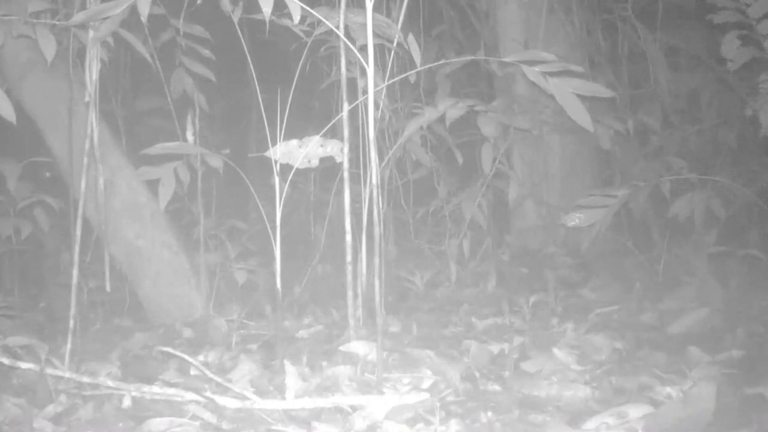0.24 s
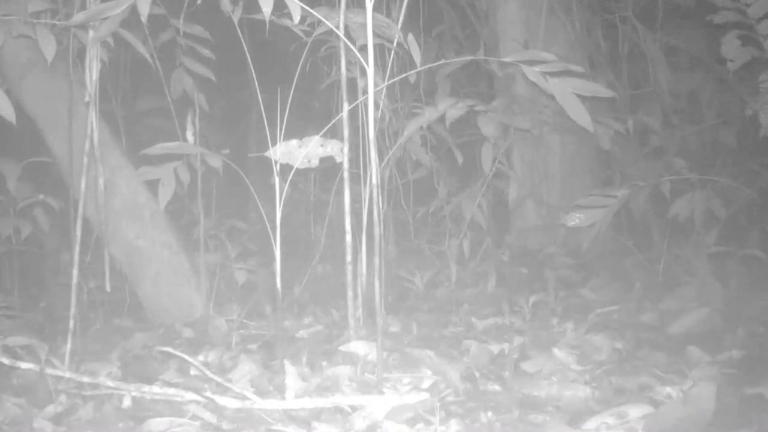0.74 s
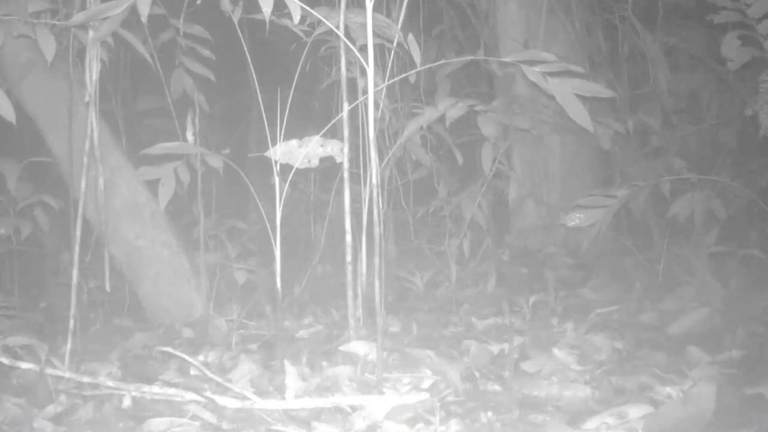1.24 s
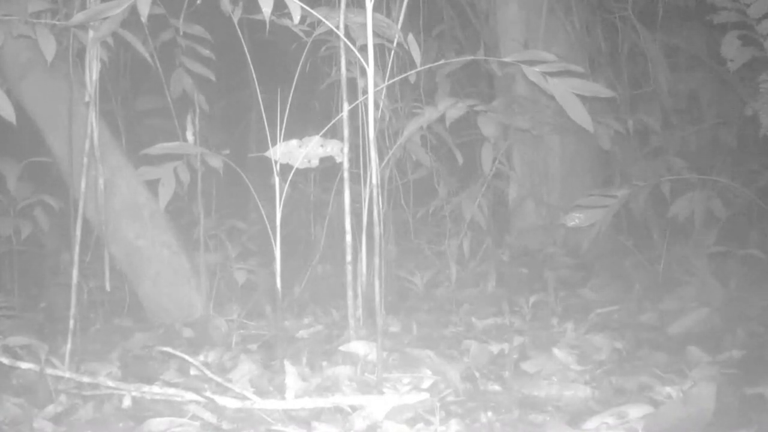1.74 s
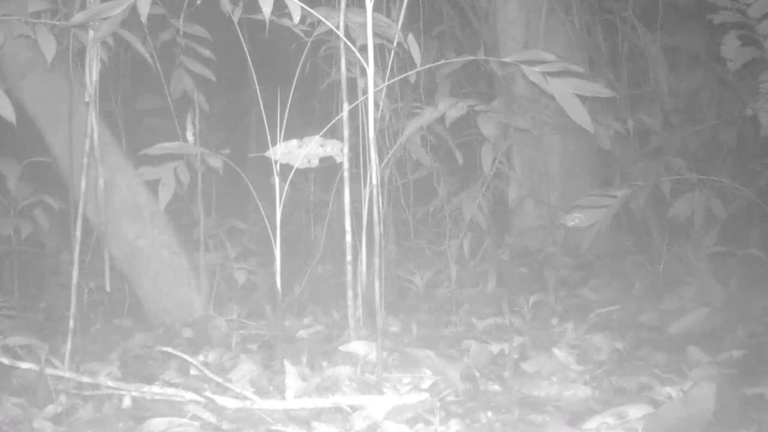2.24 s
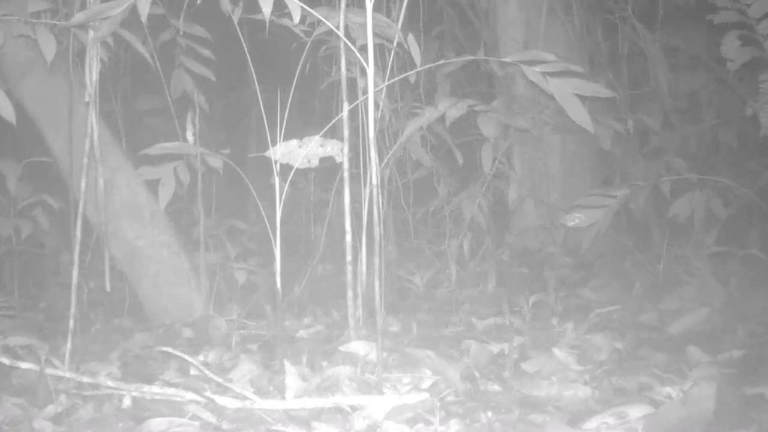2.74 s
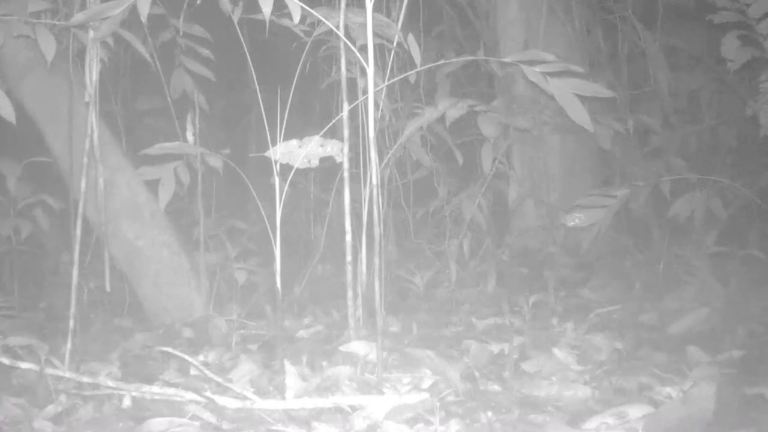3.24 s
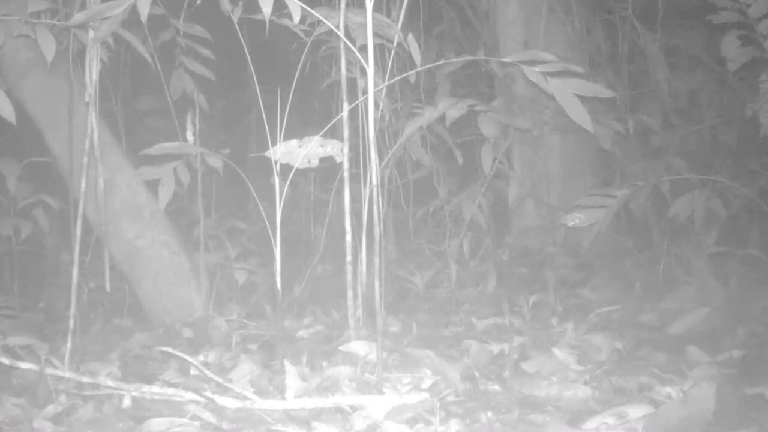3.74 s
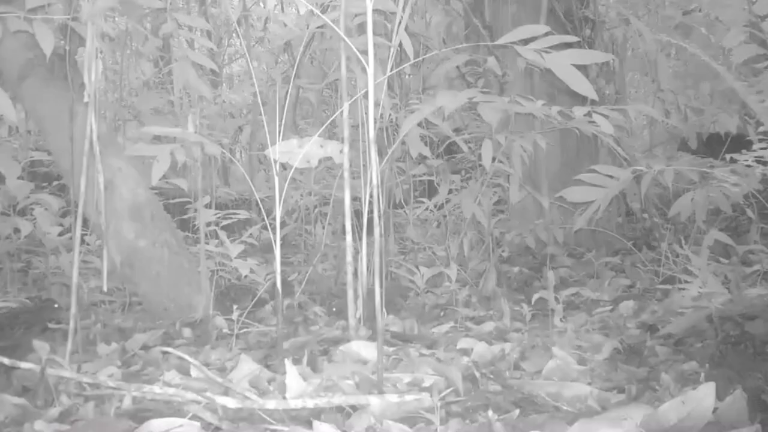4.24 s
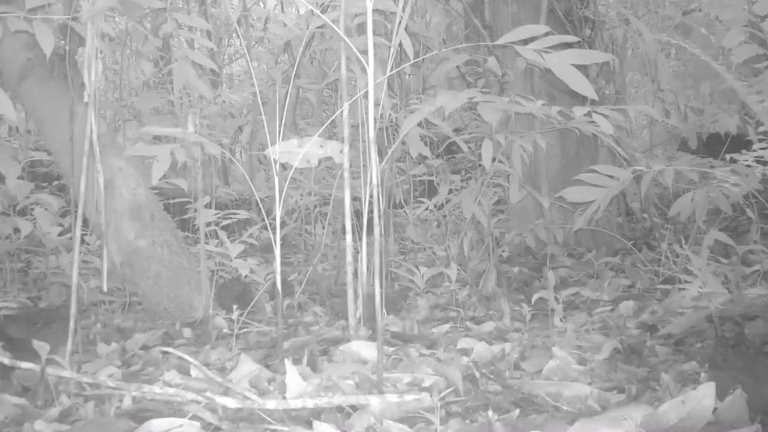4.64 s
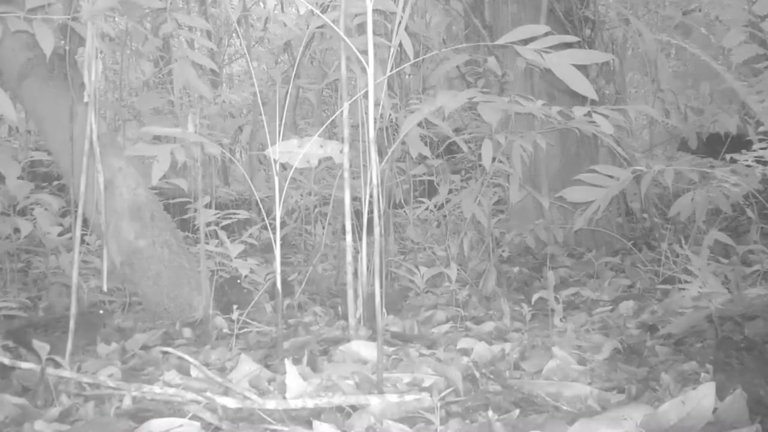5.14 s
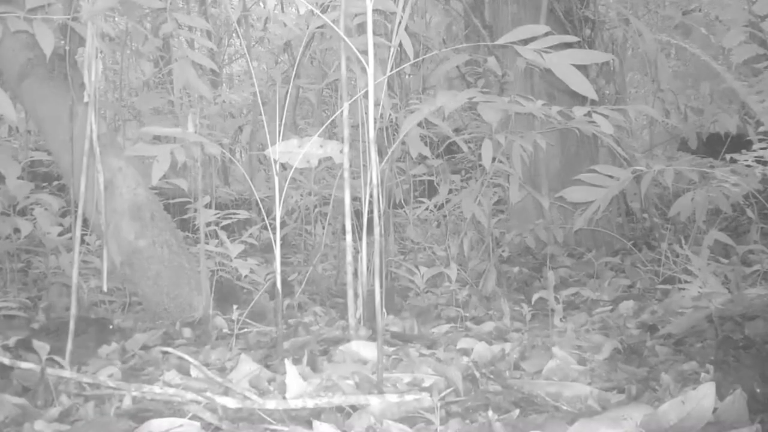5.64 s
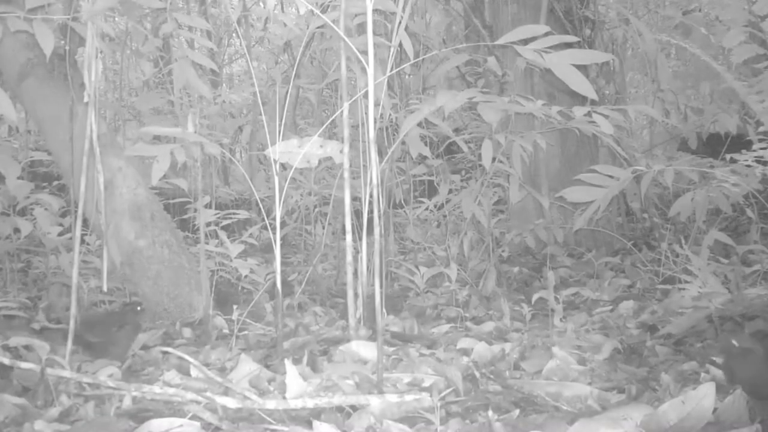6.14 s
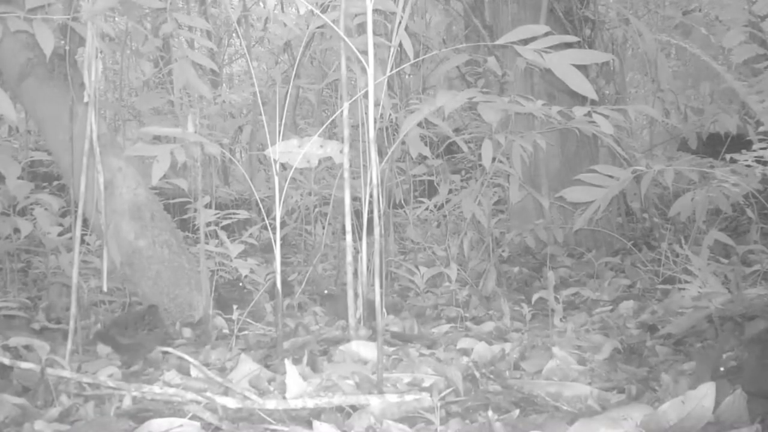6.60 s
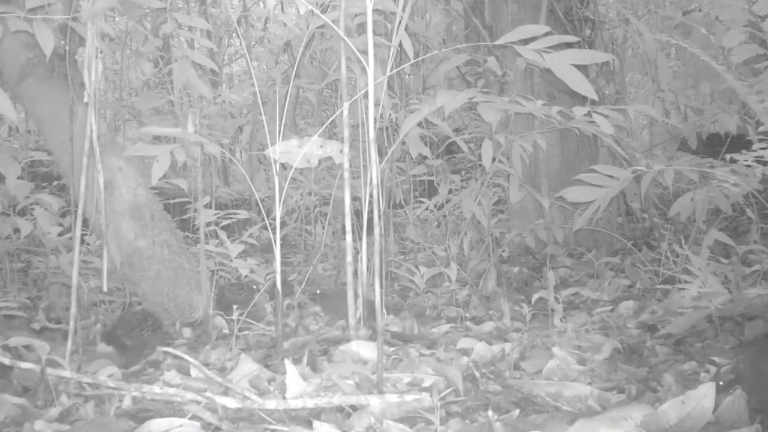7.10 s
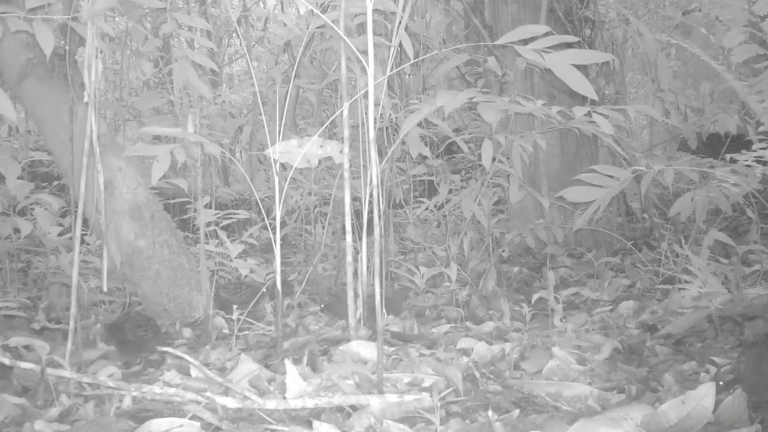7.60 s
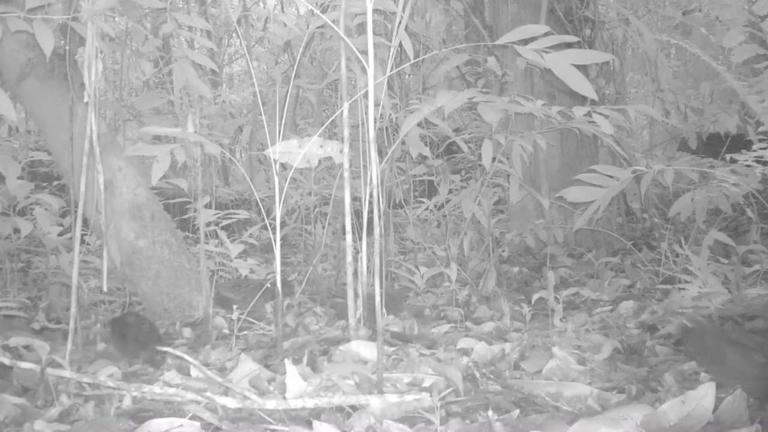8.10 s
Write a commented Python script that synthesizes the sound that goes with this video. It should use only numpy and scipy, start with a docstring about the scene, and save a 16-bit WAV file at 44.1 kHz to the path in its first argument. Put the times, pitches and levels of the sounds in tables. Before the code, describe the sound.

Heard on a trail camera's hissy microphone with a low electrical flutter, night insects sing in a dense, high, throbbing chorus while drops tick nearby. The chorus stops abruptly in a brief silence. Then comes the quieter daytime forest: a run of thin, echoing bird whistles, one barely audible chirping insect, soft scuffles of small feet in leaf litter and a few faint, hoarse bird calls far away.

```python
"""A shrill insect chorus pulses in a rain forest at night, heard on a trail camera's microphone.
Rapid strokes ring the insects' wings among the trees, and drips tap something hard close by.
The sound cuts out for a moment and returns by day: thin bird whistles echoing between the trunks,
small feet rustling faintly in the leaf litter and one far insect chirping.
The camera's own hiss and a low electrical flutter run under both scenes."""
import sys
import numpy as np
from scipy import signal
from scipy.fft import rfft, irfft, next_fast_len
from scipy.io import wavfile

SR = 44100
rng = np.random.default_rng(int(sys.argv[2]) if len(sys.argv) > 2 else 0)


def pcm_store(signal):
    """Save signal as 16-bit PCM."""
    levels = np.round(np.clip(np.atleast_2d(signal), -1, 1) * 32767)
    wavfile.write(sys.argv[1], SR, levels.astype(np.int16).T)


N = 368665
TIME = np.arange(N) / SR
# when the camera runs, night then day: start_s, end_s, first_flutter_s
CAMERA_RUNS = [(0, 3.952, .0053), (4.159, 8.4, 4.1664)]
DAY_START_S = CAMERA_RUNS[1][0]


def undb(db):
    """Decibels to gain."""
    return 10 ** (np.asarray(db) / 20)


def unit(x):
    """Scale to rms 1."""
    return x / np.sqrt(np.mean(np.abs(x) ** 2))


def curve(rows):
    """Join (time, value) points with straight lines."""
    return np.interp(TIME, *np.transpose(rows))


def butter(x, hz, kind="low"):
    """Second-order Butterworth filter."""
    return signal.sosfilt(signal.butter(2, hz, kind, fs=SR, output="sos"), x)


def colour(x, points):
    """Filter a sound through (Hz, relative dB) points and scale it to rms 1."""
    hz, db = np.transpose(points)
    size = next_fast_len(N)
    bins = np.maximum(np.fft.rfftfreq(size, 1 / SR), 1)
    gain = undb(np.interp(np.log(bins), np.log(hz), db))
    return unit(irfft(rfft(x, size) * gain, size)[:N])


def walk(per_s):
    """A smooth random wander with a spread near 1."""
    knots = rng.standard_normal(4096)
    return np.interp(TIME * per_s, np.arange(len(knots)), knots)


def bend(x, shift_hz):
    """Slide a narrow band up and down in pitch."""
    analytic = signal.hilbert(x, next_fast_len(N))[:N]
    return np.real(analytic * np.exp(2j * np.pi * np.cumsum(shift_hz) / SR))


def tone(hz, half_width_hz):
    """A band of noise; when narrow, a tone that wavers as if its echoes interfere."""
    waver = butter(rng.standard_normal(N) + 1j * rng.standard_normal(N), half_width_hz)
    return unit(np.real(waver * np.exp(2j * np.pi * hz * TIME)))


def forest(x, t60_s, direct):
    """Trunks and leaves scatter a sound into a dense, dying tail; less direct sound is farther off."""
    tail = rng.standard_normal(SR) * np.exp(-np.log(1000) * TIME[:SR] / t60_s)
    tail /= np.linalg.norm(tail)
    tail[0] += direct
    return signal.fftconvolve(x, tail)[:N] / np.hypot(1, direct)


def insects(wing, stroke_hz, jitter, count):
    """Rapid, uneven strokes ring the wings; each insect is smeared by its own path through the trees."""
    out = np.zeros(N)
    for _ in range(count):
        strokes, chance = np.zeros(N), rng.standard_normal((4096, 2))
        own_hz = stroke_hz * undb(.5 * rng.standard_normal())
        periods = (1 + jitter * chance[:, 0]) / own_hz
        at = (np.cumsum(np.abs(periods)) * SR).astype(int)
        np.add.at(strokes, at[at < N], undb(2 * chance[at < N, 1]))
        out += forest(strokes - strokes.mean(), t60_s=.26, direct=.77)
    # they are already singing, so their echoes are built up from the start
    return colour(np.roll(out, -SR), wing)


def chorus_effort():
    """Two groups pulse at slightly different rates, drifting in and out of step."""
    # pulse of each group: rate_hz, first_peak_s, share
    groups = [(6.35, .080, .56), (6.66, .104, .44)]
    return sum(share * np.cos(2 * np.pi * hz * (TIME - peak_s)) for hz, peak_s, share in groups)


def chorus(effort, level_db=-27.5, pulse_db=1.5, rise_hz=28):
    """The main insects sing louder and higher as their effort rises."""
    # wing resonance: frequency_hz, relative_db
    wing = [(3500, -60), (4000, -17), (4110, -10), (4190, -3), (4420, .5), (4620, -2.8), (4760, -7.5),
            (4900, -14.5), (5080, -23), (5400, -32), (6400, -60)]
    song = insects(wing, stroke_hz=200, jitter=.15, count=4)
    return bend(song, rise_hz * effort) * undb(level_db + pulse_db * effort)


def throbbers(rest_db=-47, fade_s=.12):
    """Higher insects with slower strokes swell in phrases above a steady level."""
    # wing resonance: frequency_hz, relative_db
    wing = [(5000, -43), (5500, -12), (5740, -0.5), (5900, 3), (6050, 0), (6220, -12), (6400, -22),
            (7000, -59.5)]
    # phrases: start_s, length_s, level_db
    phrases = [(-0.2, 0.23, -40), (0.24, 0.68, -44.5), (1.02, .38, -47), (1.41, .25, -42.5),
               (2.02, 0.64, -44.5), (3.03, .12, -43), (3.3, 0.15, -42.5), (3.5, 0.14, -46)]
    power = undb(rest_db) ** 2
    for start, length, db in phrases:
        inside_s = np.minimum(TIME - start, start + length - TIME)
        power = power + undb(db) ** 2 * np.clip(.5 + inside_s / fade_s, 0, 1)
    return insects(wing, stroke_hz=58, jitter=.06, count=8) * np.sqrt(power)


def buzzers():
    """Lower insects ring their wings in a steadier buzz."""
    # wing resonance: frequency_hz, relative_db
    wing = [(2800, -44), (3330, -21), (3500, -8.5), (3660, 1), (3800, -0.5), (3950, -6.5), (4200, -11),
            (4800, -51.5)]
    # loudness of the buzz: time_s, level_db
    levels = [(0.0, -42), (0.24, -40), (0.66, -40.5), (0.9, -42), (1.66, -42.4), (2.11, -39), (2.96, -41.5),
              (3.64, -40), (3.94, -40.5)]
    return insects(wing, stroke_hz=130, jitter=.15, count=5) * undb(curve(levels))


def far_crickets(level_db=-52.5, wander_db=1.3):
    """Distant crickets stroke sharply tuned wings, wandering a little in level."""
    # wing resonance: frequency_hz, relative_db
    wing = [(2600, -49), (2850, -10), (2915, 3.5), (2960, 0), (3010, -4.5), (3300, -45)]
    song = insects(wing, stroke_hz=30, jitter=.1, count=6)
    return song * undb(level_db + wander_db * walk(per_s=5))


def held_notes(effort):
    """Held insect notes, some pulsing with the chorus; far crowds of insects blur into bands."""
    # held notes: pitch_hz, half_width_hz, level_db, pulse_db
    # the two highest are the throbbers' steady ringing overtones
    notes = [(3166, 6, -61, 0), (4406, 9, -40.5, 1.5), (4602, 5, -38.5, 4), (5860, 9, -55, 0),
             (5917, 7, -52.5, 0)]
    # very distant insects: pitch_hz, half_width_hz, level_db
    crowds = [(2574, 54, -60), (3265, 70, -57), (8600, 600, -64.5)]
    held = sum(undb(db + pulse_db * effort) * tone(hz, width) for hz, width, db, pulse_db in notes)
    return held + sum(undb(db) * tone(hz, width) for hz, width, db in crowds)


def high_sizzle(peak_db=-60, period_s=1.13, peak_s=1.02, swing_db=6):
    """One very high insect whose faint sizzle swells and fades in slow waves."""
    wave = np.cos(2 * np.pi * (TIME - peak_s) / period_s)
    return tone(12300, half_width_hz=1500) * undb(peak_db + swing_db * (wave - 1))


def night_air(level_db=-54, flicker_db=3):
    """The flickering wash of the far forest."""
    # spectrum of the wash: frequency_hz, relative_db
    spectrum = [(600, -18.5), (1200, 3.5), (1800, 5), (3000, 8), (5300, -2), (7000, -36), (10000, -21),
                (14000, -30)]
    return colour(rng.standard_normal(N), spectrum) * undb(level_db + flicker_db * walk(per_s=40))


def camera_hiss(level_db=-36.5):
    """The camera's own steady noise, strongest in the bass."""
    # noise floor: frequency_hz, relative_db
    spectrum = [(8, -24), (30, 1.5), (110, -2), (200, -4.5), (320, -8), (500, -12), (800, -17.5),
                (1300, -23), (2200, -28), (4000, -33), (6300, -38.5), (7600, -36.5), (10500, -39),
                (14000, -41)]
    return undb(level_db) * colour(rng.standard_normal(N), spectrum)


def camera_flutter(level_db=-37.5, rate_hz=22.245, pulse_s=.0057, scatter_db=2):
    """The electronics draw current in short regular bursts that thump in the microphone circuit."""
    bursts = np.zeros(N)
    for _, end, first in CAMERA_RUNS:
        for s in np.arange(first, end, 1 / rate_hz):
            bursts[int(s * SR):int((s + pulse_s) * SR)] = -undb(scatter_db * rng.standard_normal())
    return undb(level_db) * unit(butter(butter(bursts, 20, "high"), 140))


def drips(splash_db=-7, splash_s=.0077):
    """Drops tap something hard and well damped beside the microphone, and spatter briefly."""
    # drops: start_s, gain_db, pitch_ratio
    drops = [(0.972, -37, 1.1), (0.991, -31, .95), (1.308, -35, .85), (1.362, -28.5, 1.4),
             (1.377, -31, 1.2), (2.018, -32, .9), (2.491, -33, 0.82), (2.693, -38.5, 1.1),
             (3.061, -31, 1.44), (3.6508, -15.5, 0.99)]
    # modes of the struck surface: pitch_hz, relative_db, t60_s
    modes = [(620, -13, 0.008), (1004, -4, 0.005), (1540, -11.5, 0.0079), (1770, -2.5, 0.012),
             (2300, -18.5, 0.01), (2920, -22, 0.008), (3860, 1.5, 0.0083), (6000, -5, 0.007)]
    t = TIME[:4096]
    out = np.zeros(N)
    for s, db, ratio in drops:
        ring = sum(undb(mode_db) * np.sin(2 * np.pi * hz * ratio * t) * np.exp(-np.log(1000) * t / t60)
                   for hz, mode_db, t60 in modes)
        spray = butter(butter(rng.standard_normal(len(t)), 3500), 500, "high")
        splash = undb(splash_db) * spray * np.exp(-t / splash_s)
        start = int(s * SR)
        out[start:start + len(t)] += undb(db) * (splash - ring)
    return butter(out, 8000)


def switch_on(level_db=-27, settle_s=.17):
    """A soft thump as the microphone circuit wakes by day and settles."""
    age = TIME - DAY_START_S
    return -undb(level_db) * (age >= 0) * np.exp(-np.abs(age) / settle_s)


def leaf_litter():
    """Dry leaves stir faintly and crackle under an animal's small feet."""
    # spectrum of dry leaves: frequency_hz, relative_db
    spectrum = [(1500, -19), (3000, 3.5), (4300, 2.5), (5800, 9), (6700, 7), (7600, -3), (10000, -6),
                (14000, -28)]
    # the animal's scuffles: peak_s, length_s, level_db
    scuffles = [(6.68, 0.13, -54.5), (6.833, 0.23, -52.5), (7.17, 0.16, -59), (7.41, 0.39, -58),
                (8.1, .1, -59), (8.33, .08, -58)]
    # the stir beneath them: time_s, level_db
    stir = [(4.2, -56.5), (6.4, -56), (7.4, -58), (8.0, -61)]
    crackle = rng.standard_normal(N) * undb(2 * rng.exponential(size=N) + 1.6 * walk(per_s=60))
    scuffle_power = sum(undb(db) ** 2 * np.exp(-(2 * (TIME - peak) / length) ** 2)
                        for peak, length, db in scuffles)
    return colour(crackle, spectrum) * np.sqrt(undb(curve(stir)) ** 2 + scuffle_power)


def bird_notes(notes, clearing_s, glide_s=.045, crest_share=.57):
    """Whistles slide toward a held pitch; a fast, fading tremble of the pitch makes them start husky."""
    out, tremble = np.zeros(N), walk(per_s=330)
    for start, length, first_hz, held_hz, db, rasp in notes:
        span = (TIME >= start) & (TIME < start + length)
        age = TIME[span] - start
        glide = held_hz + (first_hz - held_hz) * np.exp(-age / glide_s)
        hz = glide * (1 + rasp * np.exp(-age / clearing_s) * tremble[span])
        swell = np.sqrt(np.interp(age / length, [0, crest_share, 1], [0, 2, 0]))
        out[span] += undb(db) * swell * np.sin(2 * np.pi * np.cumsum(hz) / SR)
    return out


def near_birds():
    """Thin whistles from the nearer birds hang on between the trees."""
    # whistles: start_s, length_s, first_hz, held_hz, level_db, rasp_share_of_pitch
    whistles = [ (4.289, 0.15, 6850, 5645, -38, 0.03), (4.55, 0.18, 8020, 7590, -41.5, 0.0054),
                (4.756, 0.096, 6160, 6443, -35.5, 0.017), (4.91, 0.051, 8340, 8350, -50, .009),
                (5.053, 0.16, 6540, 7610, -36, 0.01), (5.17, 0.065, 7405, 7380, -31.5, .001),
                (5.359, 0.096, 5640, 5800, -41, .014), (5.465, 0.13, 7530, 7810, -39.5, .016),
                (5.653, 0.14, 6030, 6690, -33.5, 0.0099), (5.975, 0.15, 6920, 7530, -36, 0.0104),
                (6.231, .12, 5680, 5550, -39.5, 0.0062)]
    return forest(bird_notes(whistles, clearing_s=.156), t60_s=.9, direct=.61)


def far_insect(pitch_hz=4005, level_db=-65):
    """One distant insect chirps faintly by day."""
    # chirps: start_s, length_s
    chirps = [(4.45, .25), (5.08, 0.16), (5.524, 0.16), (5.874, .25), (6.32, 0.17), (6.995, .15),
              (7.498, .2), (7.88, .16)]
    chirping = sum((TIME >= start) & (TIME < start + length) for start, length in chirps)
    soft_gate = butter(chirping.astype(float), 12)
    return tone(pitch_hz, half_width_hz=30) * soft_gate * undb(level_db)


def far_birds():
    """Hoarse calls from deeper in the forest reach the microphone mostly as echo."""
    # calls: start_s, length_s, first_hz, held_hz, level_db, rasp_share_of_pitch
    calls = [ (5.13, .2, 10300, 9800, -57, .028), (5.35, 0.12, 8640, 8570, -50, .028),
             (5.58, 0.16, 8700, 8750, -51, 0.033), (5.74, .19, 8560, 8220, -51.5, 0.025),
             (5.875, .09, 5600, 5400, -51, .028), (7.17, .3, 6200, 6700, -61, .02),
             (7.52, .11, 2990, 3020, -52, .025), (7.8, 0.16, 2690, 3060, -54, .022),
             (8.24, 0.086, 2910, 3090, -51, .028)]
    return forest(bird_notes(calls, clearing_s=.5), t60_s=1.0, direct=.36)


def scene():
    """Night gives way to day at one microphone; the camera's noise stays."""
    effort = chorus_effort()
    night = chorus(effort) + throbbers() + buzzers() + far_crickets() + night_air()
    night += held_notes(effort) + high_sizzle() + drips()
    day = leaf_litter() + far_insect() + near_birds() + far_birds()
    outside = np.where(TIME < DAY_START_S, night, day)
    return (outside + camera_hiss() + camera_flutter() + switch_on())[None]


def record(dry):
    """The camera is silent between its two runs and cuts the treble steeply above 14 kHz."""
    running = sum((TIME >= start) & (TIME < end) for start, end, _ in CAMERA_RUNS)
    lowpass = signal.ellip(10, .1, 80, 14000, fs=SR, output="sos")
    return signal.sosfilt(lowpass, dry * running)


dry = scene()
out = record(dry)
pcm_store(out)
```